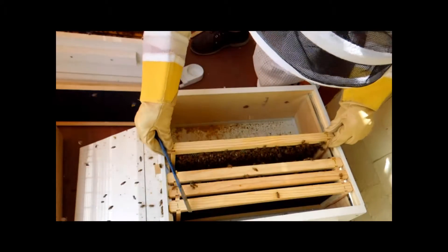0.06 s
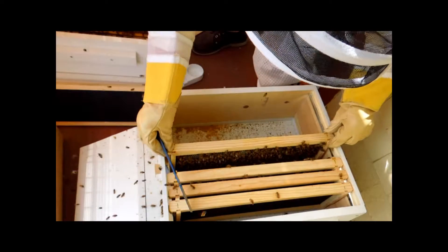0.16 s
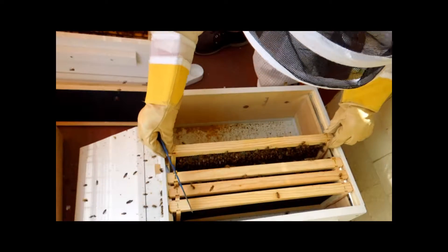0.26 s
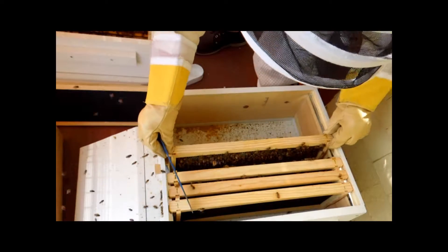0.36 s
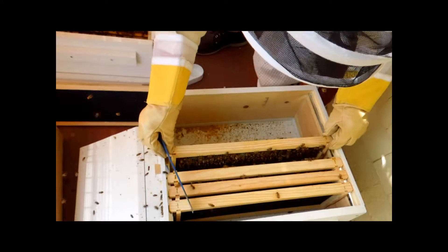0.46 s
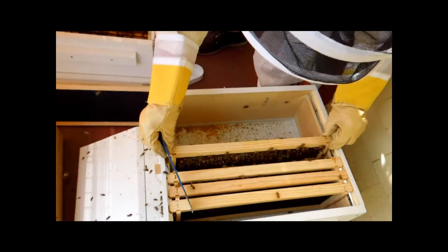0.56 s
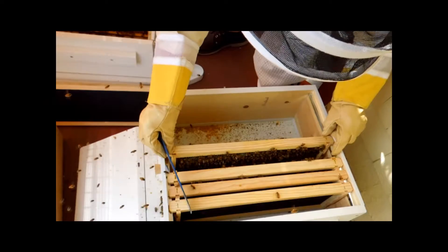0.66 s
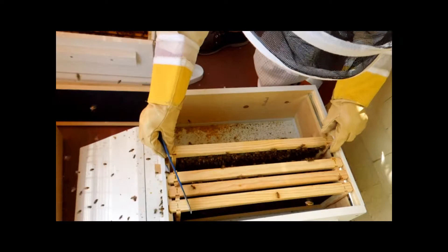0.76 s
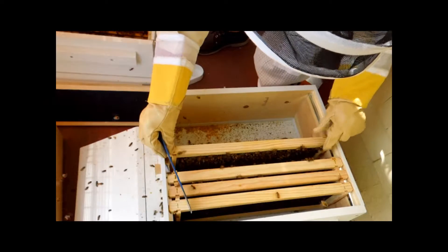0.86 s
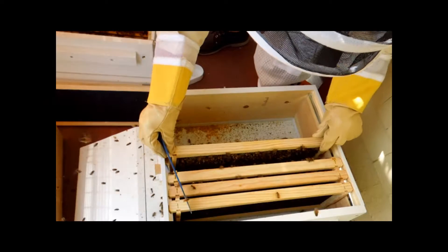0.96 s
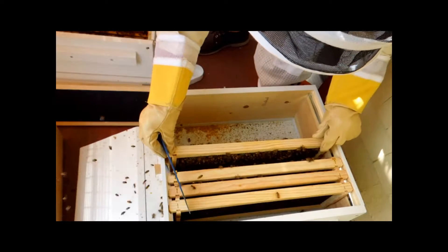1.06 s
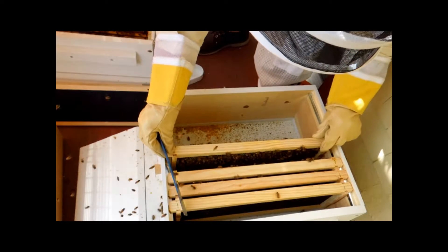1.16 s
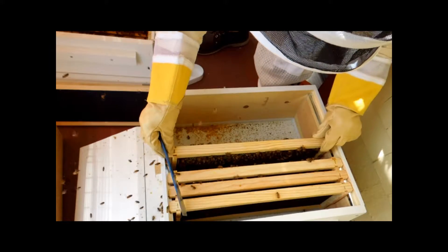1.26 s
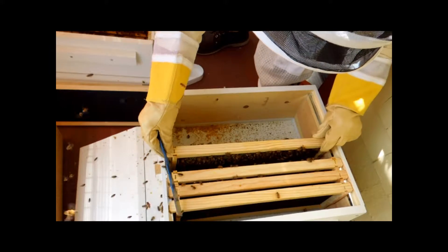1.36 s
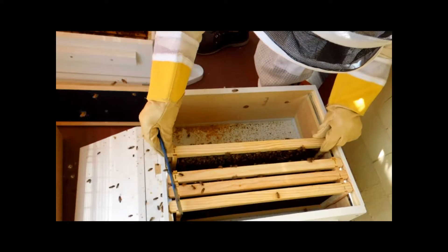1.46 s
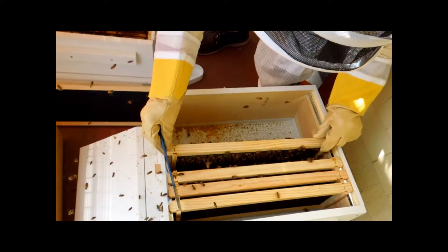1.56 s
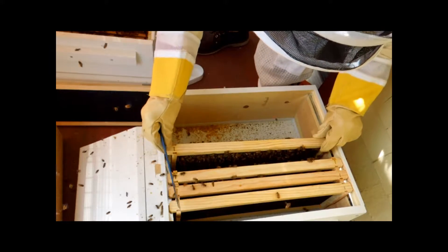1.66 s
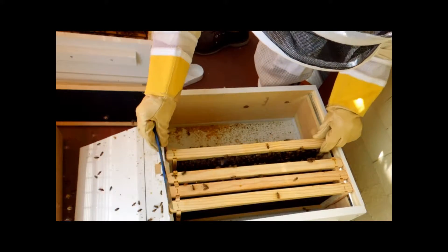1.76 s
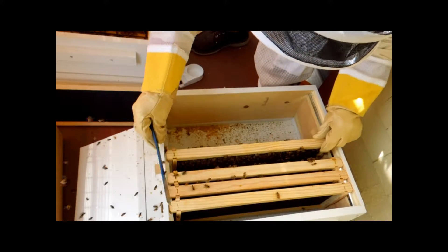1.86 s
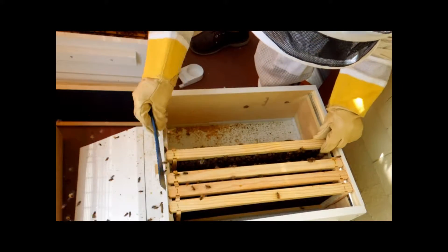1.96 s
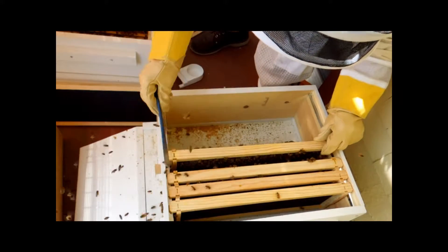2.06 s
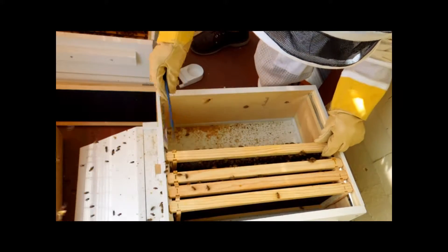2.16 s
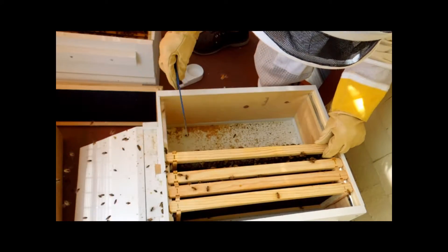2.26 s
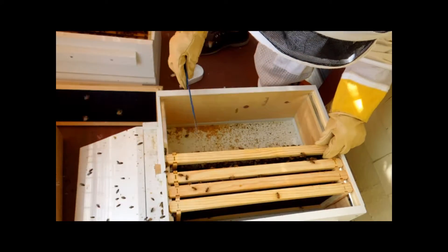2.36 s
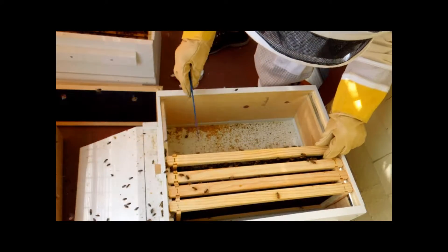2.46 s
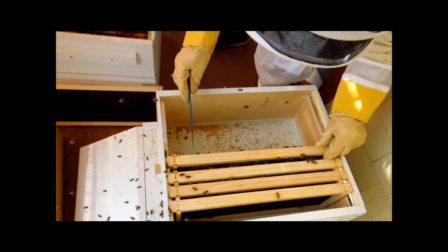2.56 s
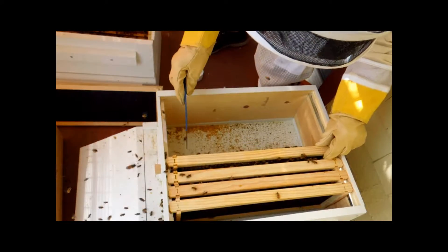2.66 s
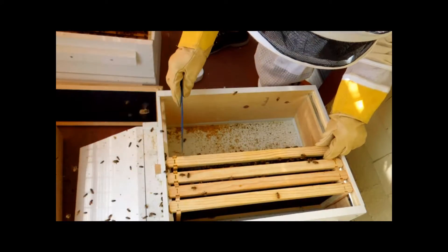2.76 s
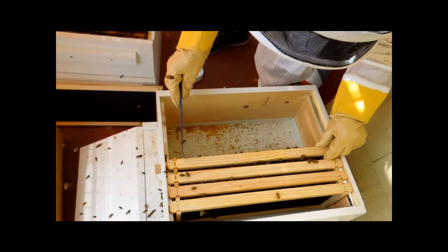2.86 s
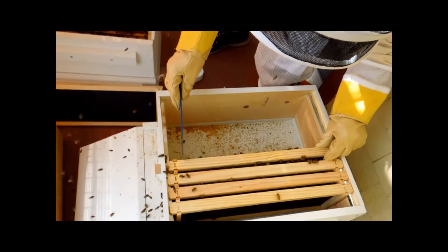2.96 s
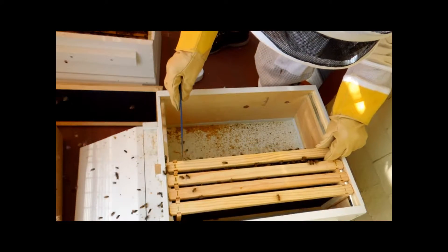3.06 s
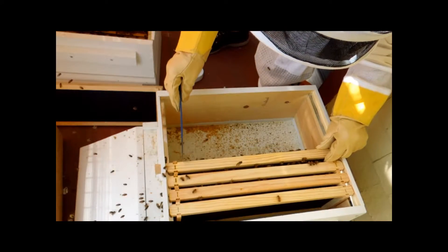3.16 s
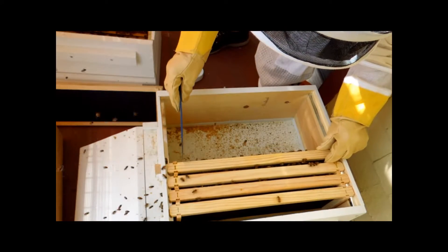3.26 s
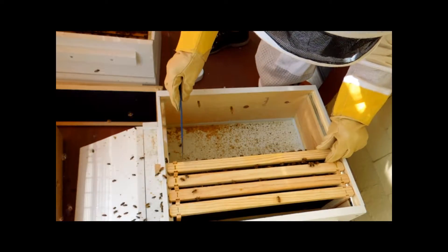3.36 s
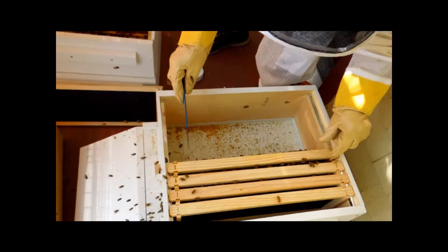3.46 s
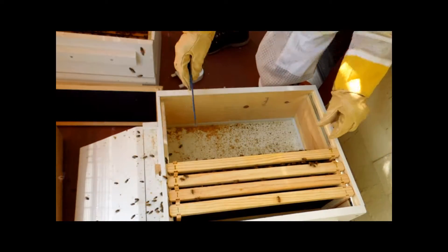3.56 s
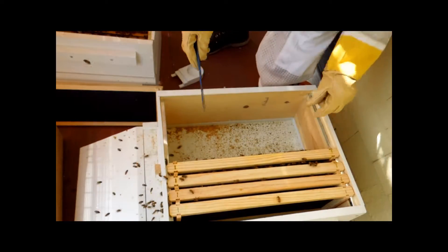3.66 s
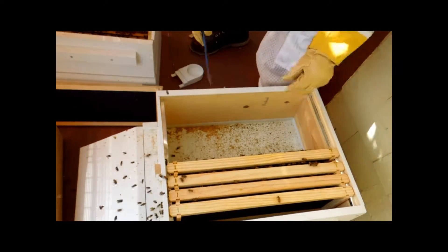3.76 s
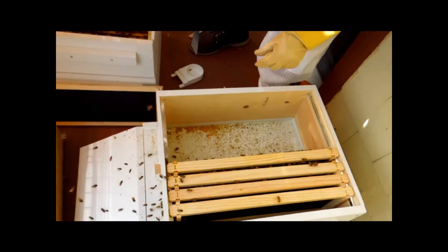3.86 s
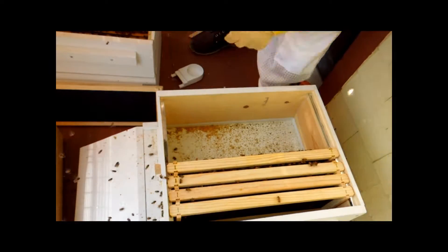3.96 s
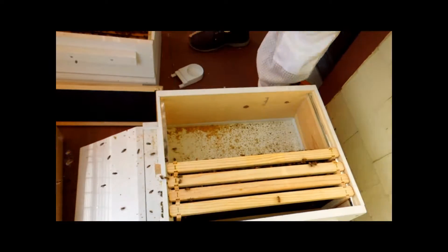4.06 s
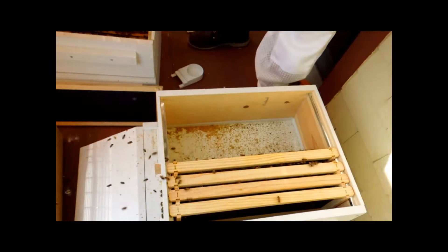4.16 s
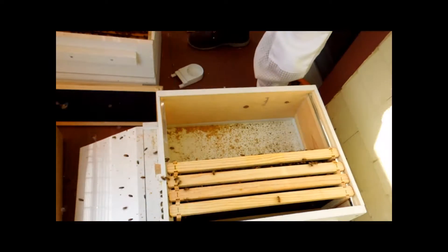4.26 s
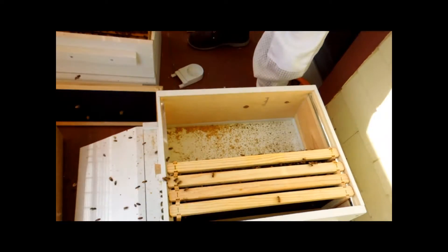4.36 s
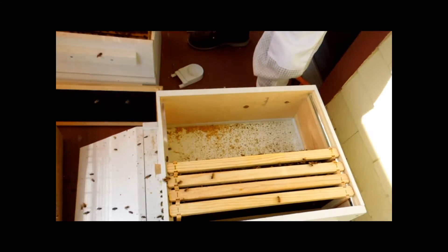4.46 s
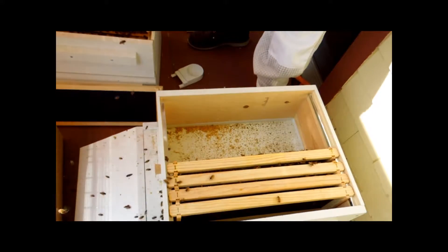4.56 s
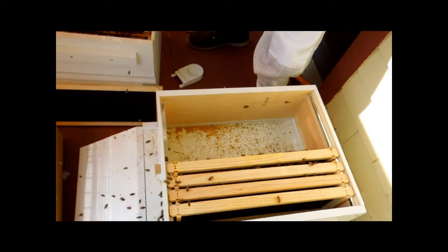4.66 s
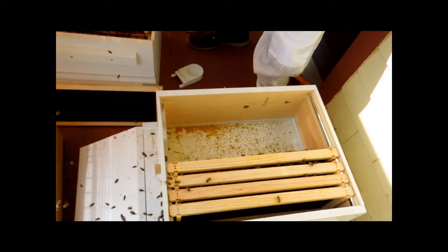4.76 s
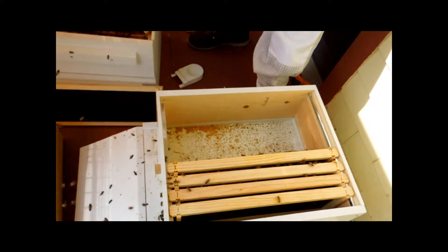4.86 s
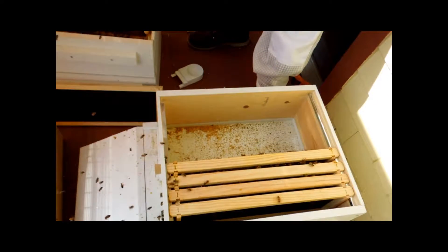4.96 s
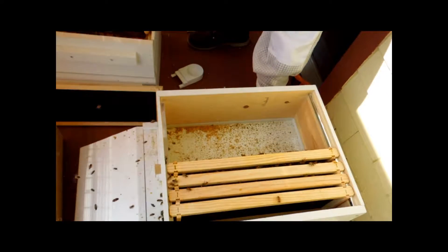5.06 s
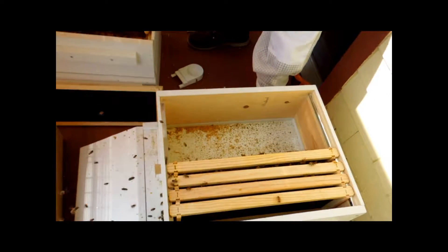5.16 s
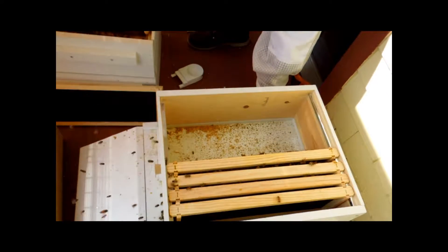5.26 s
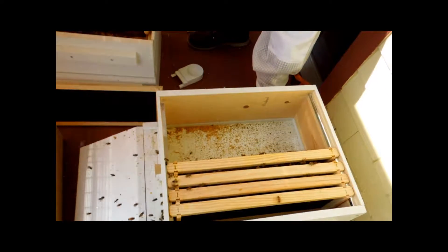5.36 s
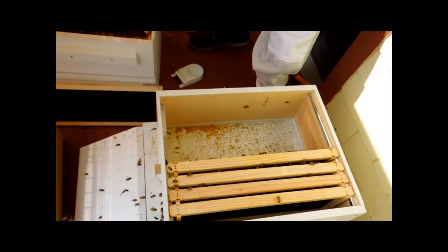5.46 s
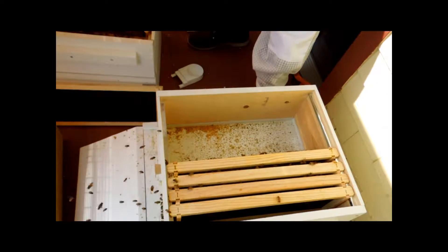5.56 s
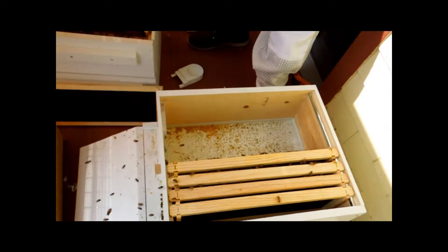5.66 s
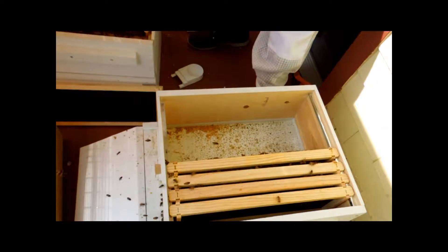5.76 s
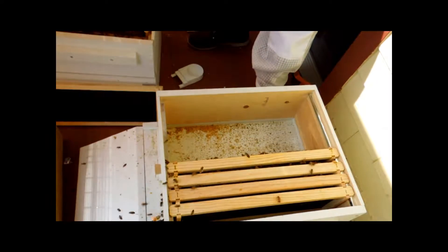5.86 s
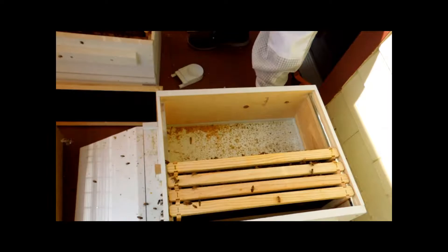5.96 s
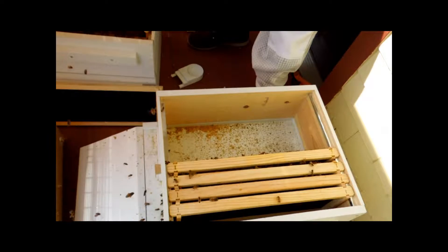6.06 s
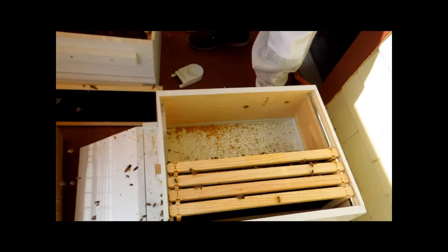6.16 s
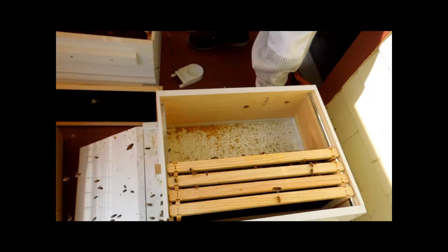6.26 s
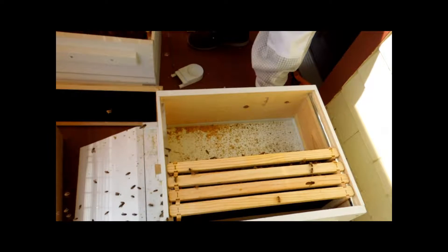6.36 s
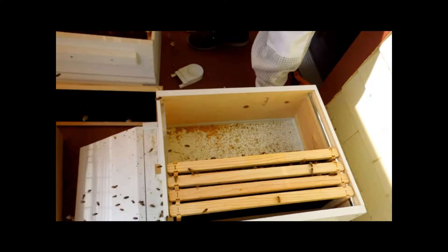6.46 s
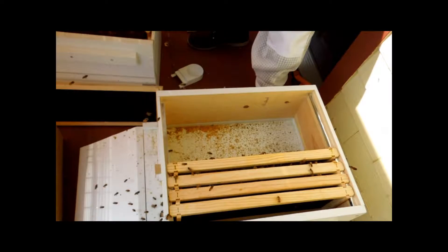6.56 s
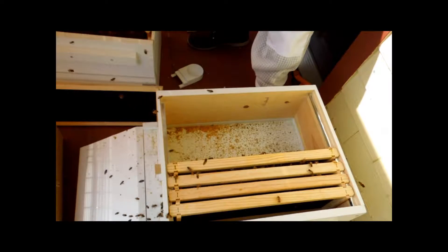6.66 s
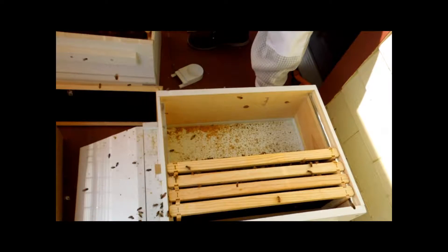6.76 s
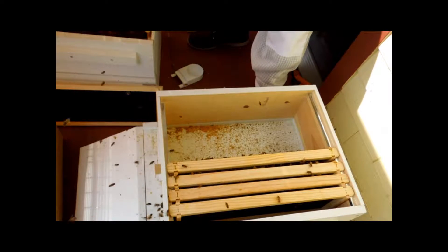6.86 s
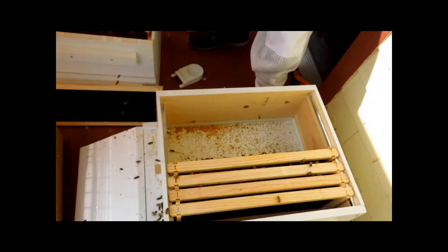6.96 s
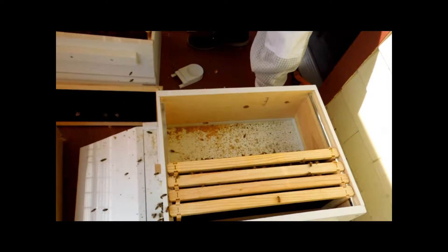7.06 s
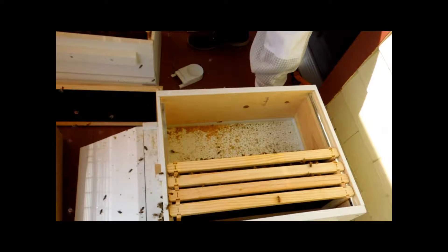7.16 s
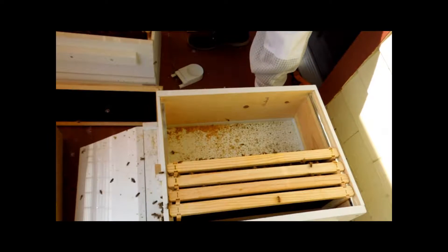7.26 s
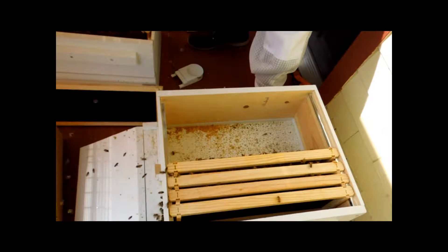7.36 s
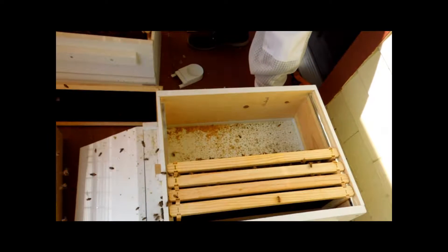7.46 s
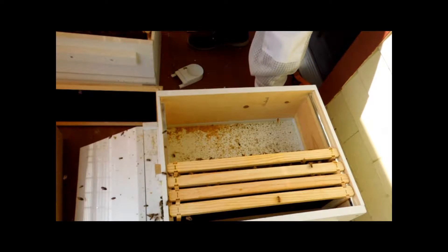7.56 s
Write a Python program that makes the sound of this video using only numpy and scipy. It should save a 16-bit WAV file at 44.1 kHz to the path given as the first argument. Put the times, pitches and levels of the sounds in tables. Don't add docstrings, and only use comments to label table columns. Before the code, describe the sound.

A blurred bee buzz, airy hiss and distant traffic open quietly, with light cloth rustle. One loud steel-on-wood knock rings shortly in the hive box, followed by a few tiny bird chirps. An approaching diesel's pulsing hum rises unevenly in level and slightly in pitch, beating as it nears, with road roar beneath. Bees surge at the close. Near microphones, short shed reflections.

```python
import sys
import numpy as np
from scipy import signal
from scipy.fft import rfft, irfft
from scipy.io import wavfile
from scipy.ndimage import uniform_filter1d, map_coordinates

SR = 44100
rng = np.random.default_rng(int(sys.argv[2]) if len(sys.argv) > 2 else 0)


def convert_level_to_amplitude(level_db):
    exponent = np.asarray(level_db, float) / 20
    return 10 ** exponent


def transcribe(signal):
    frames = np.atleast_2d(signal).T
    limited = np.clip(frames, -1, 1)
    pcm = np.round(limited * 32767).astype(np.int16)
    wavfile.write(sys.argv[1], SR, pcm)


N = 335592

# (time [s], speed [turns/min])
ENGINE_RPM = [(0.0, 1835), (0.4, 1850), (0.8, 1880), (1.6, 1923), (2.4, 1979), (3.2, 2022), (4.0, 2072),
              (4.8, 2083), (5.2, 2106), (5.6, 2121), (6.0, 2095), (6.4, 2100), (6.8, 2091), (6.95, 2083),
              (7.1, 2040), (7.61, 2067)]
# (time [s], level [dB])
NEARNESS = [(0, -24), (1, -14.5), (2, -10.5), (3, -9), (4, -5.5), (5, -2.5), (6, -0.9), (7, -1.9),
            (7.61, 0.7)]


def engine():
    cycle_hz = curves(ENGINE_RPM)[0] / 120
    turn_rad = 2 * np.pi * np.cumsum(cycle_hz) / SR
    near_db = curves(NEARNESS)[0]
    strong = strong_orders(cycle_hz, turn_rad, near_db)
    middle = middle_orders(cycle_hz, turn_rad, near_db)
    return np.sqrt(2) * (weak_orders(turn_rad) + strong + middle)


STRONG_ORDERS = {5: (-23.5, 1.05), 8: (-24.5, 1.38), 12: (-37, 1), 13: (-38.5, 0.42)}
# (time [s], level [dB], half-width [s])
PATHS_5 = [(.06, -11, 0.16), (.52, 5, 0.55), (2.36, -5, 0.049), (2.74, 5.5, 0.19), (3.66, 4.5, 0.14),
           (4.15, -8, .2), (4.42, -9, .05), (4.76, 4, .15), (5.0, -3.5, .05), (5.18, -3, 0.031),
           (5.42, -6.5, 0.039), (5.58, 2.5, .16), (5.82, -9, .06), (6.23, -5, 0.035), (6.44, -4, 0.037),
           (6.57, 4.5, 0.084), (6.72, -5, .04), (6.86, 3, 0.08), (7.18, -4, 0.063), (7.62, 6.5, 0.17)]
PATHS_8 = [(1.04, -8, 0.14), (1.44, 4, 0.29), (2.68, -4, 0.1), (3.82, -11, 0.11), (4.18, 6, 0.27),
           (4.44, 1, 0.07), (4.62, -11, 0.07), (4.8, 3, 0.11), (5.02, -4.1, 0.022), (5.2, -7.5, 0.03),
           (5.66, 3.5, 0.15), (6.94, 5.5, 0.055), (7.12, -3.1, 0.13), (7.46, -5, 0.085)]
PATHS_12 = [(1.08, -18, 0.3), (3.36, 6.5, 0.46), (3.92, -20, 0.085), (4.04, 8, 0.087), (4.46, -20, 0.095),
            (5.52, 2.5, 0.31), (6.72, -5, 0.14)]
PATHS_13 = [(0.58, -13, 0.1), (0.9, 3.5, 0.45), (2.56, 3, 1), (3.36, -8.5, 0.17), (4.18, -4, 0.14),
            (4.44, 6.5, 0.085), (4.8, 3.4, 0.054), (6.62, -4, 0.18), (7.3, 2, 0.45)]
BOX_HZ, BOX_WIDTH_HZ, BOX_DB = 211.4, 6.6, 7
FLUTTER_DB, FLUTTER_PER_S = 1, 6.5
WANDER_RAD, WANDER_PER_S = .25, 2.484
ECHO_DB, ECHO_FLAT_SHARE, ECHO_START_RAD = -17, .0421, .3


def strong_orders(cycle_hz, turn_rad, near_db):
    paths = PATHS_5, PATHS_8, PATHS_12, PATHS_13
    flutters = drift(FLUTTER_PER_S, count=4)
    slips = drift(WANDER_PER_S, count=4)
    out = np.zeros(N)
    for (k, (db, growth)), rows, flutter, slip in zip(STRONG_ORDERS.items(), paths, flutters, slips):
        box_db = BOX_DB * np.exp(-((k * cycle_hz - BOX_HZ) / BOX_WIDTH_HZ) ** 2)
        level_db = db + growth * near_db + box_db + swells(rows) + FLUTTER_DB * flutter
        direct = order(k, turn_rad, WANDER_RAD * slip)
        echo = convert_level_to_amplitude(ECHO_DB) * order(k, (1 - ECHO_FLAT_SHARE) * turn_rad, ECHO_START_RAD + slip)
        out += convert_level_to_amplitude(level_db) * (direct + echo)
    return out


# (order, level [dB])
MIDDLE_ORDERS = [(9, -7), (10, 0), (11, -5), (15, -7)]
MIDDLE_DB, MIDDLE_GROWTH, NINTH_GROWTH = -31.5, 1.255, .7
SHED_HZ, SHED_WIDTH_HZ, SHED_DB = 153.3, 3.2, 16


def middle_orders(cycle_hz, turn_rad, near_db):
    pack = orders(MIDDLE_ORDERS, turn_rad)
    pack[0] *= convert_level_to_amplitude(NINTH_GROWTH * approach_db())
    pack[1] *= 1 + convert_level_to_amplitude(SHED_DB) * np.exp(-((10 * cycle_hz - SHED_HZ) / SHED_WIDTH_HZ) ** 2)
    return convert_level_to_amplitude(MIDDLE_DB + MIDDLE_GROWTH * near_db) * sum(pack)


# (order, level [dB])
WEAK_ORDERS = [(2, -13), (3, -15), (6, -6), (7, -10), (14, -6), (16, -7), (17, -11), (19, -14), (22, -16)]
# (time [s], level [dB], half-width [s])
LAST_BLOOM = [(7.5, 8, 0.14)]


def weak_orders(turn_rad):
    return convert_level_to_amplitude(approach_db() - 49 + swells(LAST_BLOOM)) * sum(orders(WEAK_ORDERS, turn_rad))


def orders(table, turn_rad):
    fades = drift(3.0, count=len(table))
    return [convert_level_to_amplitude(db + 1.8 * fade) * order(k, turn_rad, .2 * fade) for (k, db), fade in zip(table, fades)]


def order(k, turn_rad, wander_rad=0):
    smear_rad = -.19 * (k - 8) ** 2
    return np.cos(k * turn_rad + .6 * (k % 2) + smear_rad + wander_rad)


# (frequency [Hz], density [dB per Hz])
ROAR_SPECTRUM = [(200, -4), (300, -4), (460, -5.5), (680, -11), (1400, -11), (1900, -14), (2500, -20),
                 (4000, -29), (6000, -45), (9000, -62)]
# (frequency [Hz], density [dB per Hz])
RUMBLE_SPECTRUM = [(12, -28), (22, -12), (35, -3), (50, -4), (65, -5), (100, -6), (200, -7), (280, -5),
                   (380, -9), (480, -25)]
FAR_ROAR_DB, NEAR_ROAR_DB, CLOSING_DB_PER_S = -43, -32.5, 5
RUMBLE_DB, RUMBLE_GROWTH = -42.5, 0.52


def road():
    lumps = convert_level_to_amplitude(1.63 * drift(6.0, count=1)[0])
    rumble = evened(colour(rng.standard_normal(N), RUMBLE_SPECTRUM)) * lumps
    roar = convert_level_to_amplitude(FAR_ROAR_DB + approach_db()) * patchy(ROAR_SPECTRUM, 1.0)
    return roar + convert_level_to_amplitude(RUMBLE_DB + RUMBLE_GROWTH * approach_db()) * rumble


def approach_db():
    near_db = NEAR_ROAR_DB - FAR_ROAR_DB - CLOSING_DB_PER_S * np.arange(N)[::-1] / SR
    return 10 * np.log10(1 + convert_level_to_amplitude(2 * near_db))


# (frequency [Hz], density [dB per Hz])
SWARM_SPECTRUM = [(200, -29), (280, 8), (350, -29), (400, -1.5), (500, -1), (650, -13), (950, -9),
                  (1220, -11), (1600, -30.5), (2200, -20.5), (3200, -22), (6000, -37)]
# (time [s], level [dB], half-width [s])
STIRS = [(4.2, 1, 0.97), (5.3, 1, 0.19), (7.42, 7, 0.29)]
SWARM_DB, SWARM_GROWTH = -44, 0.26


def swarm(count=22):
    harmonic = np.arange(1, 25)[:, None]
    out, cells = np.zeros(N), 1024
    for pitch, near in zip(drift(5.0, count=count), drift(3.0, count=count)):
        phase_turns = harmonic * np.arange(cells) / cells + rng.random(harmonic.shape)
        beat = np.cos(2 * np.pi * phase_turns).sum(0)
        wing_hz = rng.uniform(200, 265) * (1 + .03 * pitch)
        cell = (np.cumsum(wing_hz) / SR * cells).astype(int) % cells
        out += convert_level_to_amplitude(3.56 * near) * beat[cell]
    out = evened(out) + .5 * rng.standard_normal(N)
    level_db = SWARM_DB + SWARM_GROWTH * approach_db() + swells(STIRS)
    return convert_level_to_amplitude(level_db) * evened(colour(out, SWARM_SPECTRUM))


# (frequency [Hz], level [dB], t60 [s])
FRAME_MODES = [(136, -1, .2), (182, -6, .17), (215, -11, .14), (285, -13, .13), (403, -4, .17),
               (465, -11, .12), (560, -11, .14), (752, -20, .11), (1020, -14, .13), (1140, -16, .13),
               (1266, -21, .11), (1885, -22, .07), (2106, -25, .1), (2406, -25, .09), (2743, -22, .08),
               (3093, -25, .09), (3278, -25, .1), (3430, -24, .09), (3830, -23, .06), (4943, -17, .07)]
# (frequency [Hz], density [dB per Hz])
CRACK_SPECTRUM = [(400, -31), (700, -2), (1500, -10), (2900, -8), (4000, -10.5), (6200, -15), (8500, -15),
                  (11600, -10), (14300, -16)]
KNOCK_S, KNOCK_DB = 1.902, -12
BOUNCE_S, BOUNCE_DB = .024, -4


def knock():
    t, out = np.arange(SR // 4) / SR, np.zeros(N)
    rise = np.clip(t / 0.0026, 0, 1)
    modes = [convert_level_to_amplitude(db - 60 * t / t60) * np.sin(2 * np.pi * hz * t) for hz, db, t60 in FRAME_MODES]
    ring = rise * sum(modes)
    chatter = convert_level_to_amplitude(-8) * np.clip(t / .0015, 0, 1) * np.exp(-(t / .006) ** 3)
    splash = convert_level_to_amplitude(-7 - 60 * t / 0.12) * rise
    crack = evened(colour(rng.standard_normal(len(t)), CRACK_SPECTRUM)) * (chatter + splash)
    add(out, KNOCK_S, convert_level_to_amplitude(KNOCK_DB) * (ring + crack))
    add(out, KNOCK_S + BOUNCE_S, convert_level_to_amplitude(KNOCK_DB + BOUNCE_DB) * uniform_filter1d(ring, size=30))
    return out


# (time [s], length [s], start [Hz], end [Hz], level [dB])
CHIRP_EVENTS = [
    (2.163, 0.038, 3070, 2880, -45),
    (2.77, .035, 2980, 2950, -43),
    (2.905, .04, 2890, 3000, -41),
    (2.925, 0.04, 3000, 2650, -48),
    (4.679, .08, 330, 323, -33),
    (7.057, .11, 2900, 2900, -50),
    (7.19, .14, 2240, 2254, -47),
    (7.297, .1, 2640, 2650, -47),
]


def chirps():
    out = np.zeros(N)
    for s, length_s, start_hz, end_hz, db in CHIRP_EVENTS:
        hz = np.linspace(start_hz, end_hz, round(length_s * SR))
        rough = evened(uniform_filter1d(rng.standard_normal(8192), size=120))
        grain = 1 + 0.29 * rough[:len(hz)]
        tone = np.sin(2 * np.pi * np.cumsum(hz) / SR)
        add(out, s, convert_level_to_amplitude(db) * grain * np.hanning(len(hz)) * tone)
    return out


# (time [s], length [s], centre [Hz], width [Hz], level [dB])
RUSTLE_EVENTS = [
    (.03, 0.019, 5960, 5400, -40),
    (.275, 0.014, 3500, 2000, -46),
    (0.788, .018, 4200, 1500, -47),
    (3.548, .008, 3000, 1500, -46),
    (3.88, .015, 4300, 1000, -48),
    (4.125, .025, 11500, 3500, -41),
    (4.192, 0.017, 10000, 4000, -41),
    (4.25, .07, 6500, 3500, -47),
    (4.708, 0.012, 2800, 900, -40),
    (7.069, 0.025, 3500, 2500, -44),
]


def rustles():
    out = np.zeros(N)
    hz = np.fft.rfftfreq(8192, 1 / SR)
    for s, length_s, centre_hz, width_hz, db in RUSTLE_EVENTS:
        band = np.exp(-((hz - centre_hz) / width_hz) ** 2)
        puff = evened(irfft(rfft(rng.standard_normal(8192)) * band))
        length = round(length_s * SR)
        add(out, s, convert_level_to_amplitude(db) * puff[:length] * signal.windows.tukey(length, .6))
    return out


def shed(x, t60_s=0.14):
    t = np.arange(SR // 3) / SR
    tail = rng.standard_normal(len(t)) * convert_level_to_amplitude(-60 * t / t60_s)
    return signal.oaconvolve(x, tail / np.linalg.norm(tail))[:N]


# (frequency [Hz], density [dB per Hz])
HISS_SPECTRUM = [(1500, -36), (3000, -10.5), (4500, -13.5), (6000, -14.5), (8000, -10), (10000, -5.5),
                 (11500, -2), (12800, -4), (14300, -11.5)]
# (time [s], level [dB], half-width [s])
FABRIC_SWISH = [(.03, 1, .15), (2.84, 1, 0.33), (4.3, 4, 0.51)]
HISS_DB, HISS_GROWTH = -46.5, 0.052


def hiss():
    level_db = HISS_DB + HISS_GROWTH * approach_db() + swells(FABRIC_SWISH)
    return convert_level_to_amplitude(level_db) * patchy(HISS_SPECTRUM, 1.0)


# (frequency [Hz], level [dB])
UNLIKE_SHARE = [(25, -9), (60, -24), (300, -23), (900, -22), (1800, -24), (3500, -22), (5000, -15),
                (7000, -6), (10000, -3), (14000, -3)]
# (frequency [Hz], level [dB])
LEVEL_LEAN = [(25, 3.5), (60, 1.6), (150, .5), (370, 0), (2300, 0), (5800, .6), (9000, 2.3), (14300, 2.7)]
# (frequency [Hz], phase [rad])
PHASE_LEAD = [(30, -1.9), (90, -0.41), (160, -0.24), (300, -0.24), (1000, 0.17)]


def ports(mid, unlike):
    hz = np.fft.rfftfreq(N, 1 / SR)
    mid, side = rfft(mid), rfft(unlike) * convert_level_to_amplitude(read(UNLIKE_SHARE, hz))
    lean = convert_level_to_amplitude(read(LEVEL_LEAN, hz) / 2) * np.exp(.5j * read(PHASE_LEAD, hz))
    return irfft(np.array([(mid + side) * lean, (mid - side) / lean]), N)


def patchy(tone, patch_db):
    frames, hz = N // 256 + 5, np.fft.rfftfreq(1024, 1 / SR)
    a, b, patches = rng.standard_normal((frames, 513, 3)).T
    patches = evened(uniform_filter1d(uniform_filter1d(patches, 12, 0), 14, 1))
    z = (a + 1j * b) * convert_level_to_amplitude(read(tone, hz)[:, None] + patch_db * patches)
    return evened(signal.istft(z, nperseg=1024, noverlap=768)[1][:N])


def colour(x, tone):
    gain = convert_level_to_amplitude(read(tone, np.fft.rfftfreq(x.shape[-1], 1 / SR)))
    return irfft(rfft(x) * gain, x.shape[-1])


def drift(per_s, count):
    knots = rng.standard_normal((count, 400))
    at = np.arange(0, N + 256, 256) / SR * per_s
    slow = [map_coordinates(k, [at + 2], order=3) for k in knots]
    return [np.interp(np.arange(N) / 256, np.arange(len(at)), c) for c in slow]


def swells(rows):
    t = np.arange(N) / SR
    return sum(db * np.exp(-((t - s) / half_s) ** 2) for s, db, half_s in rows)


def curves(rows):
    s, *columns = np.transpose(rows)
    return [np.interp(np.arange(N) / SR, s, c) for c in columns]


def read(points, hz):
    f, value = np.transpose(points)
    return np.interp(np.log(hz + 1), np.log(f + 1), value)


def evened(x):
    return x / np.sqrt(np.mean(x ** 2) + 1e-20)


def add(mix, s, sound):
    part = mix[round(s * SR):][:len(sound)]
    part += sound[:len(part)]


def scene():
    vehicle = engine()
    air = road() + swarm() + knock() + chirps() + rustles()
    return ports(vehicle + air + hiss(), shed(air) + hiss())


def band_limit(x):
    return signal.sosfilt(signal.butter(12, 14940, fs=SR, output="sos"), x)


DUCK_DB, DUCK_AFTER_S, RECOVER_S = -2.5, 0.044, 0.37
EDGE_HZ = 14290


def record(dry):
    after_s = np.arange(N) / SR - KNOCK_S - DUCK_AFTER_S
    dip = np.clip(after_s / .01, 0, 1) * np.exp(-(after_s / RECOVER_S) ** 2)
    ducked = dry * convert_level_to_amplitude(DUCK_DB * dip)
    edge = signal.firwin(2047, EDGE_HZ, window=("kaiser", 8), fs=SR)
    mix = signal.oaconvolve(ducked, edge[None], "same")
    return band_limit(mix)


dry = scene()
out = record(dry)
transcribe(out)
```